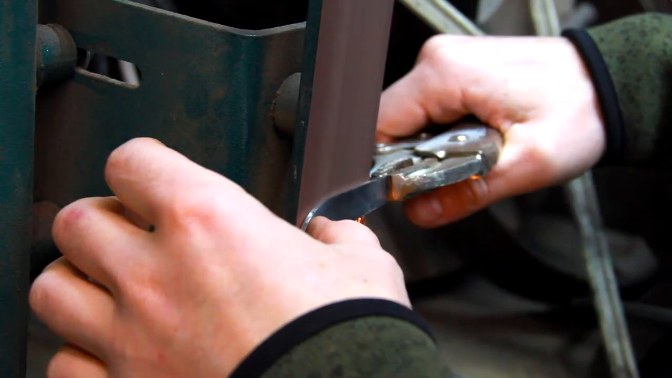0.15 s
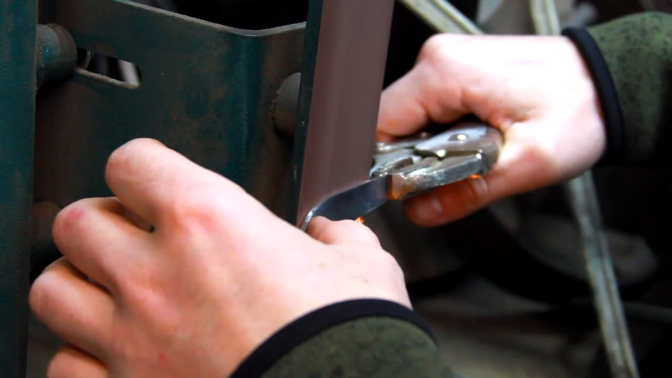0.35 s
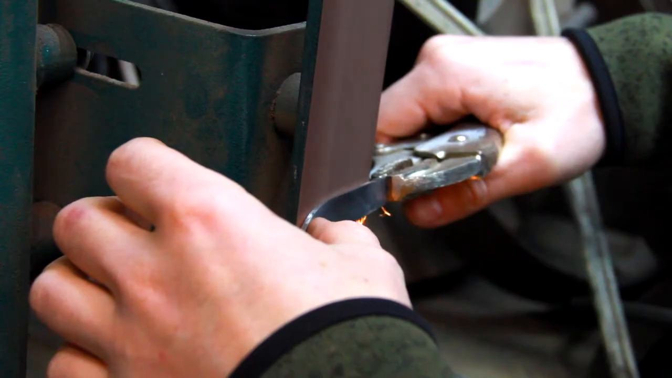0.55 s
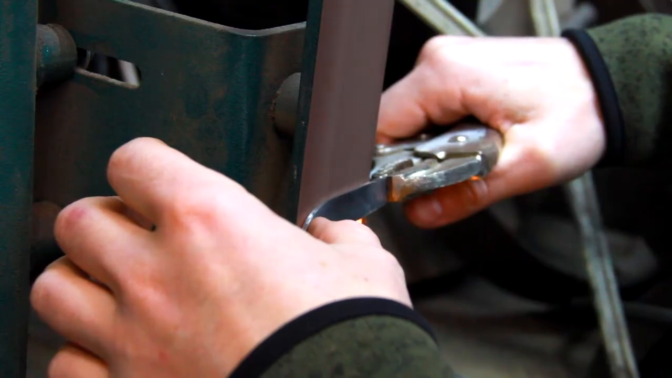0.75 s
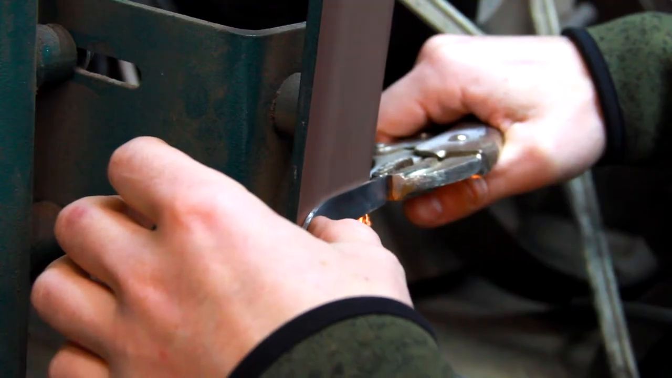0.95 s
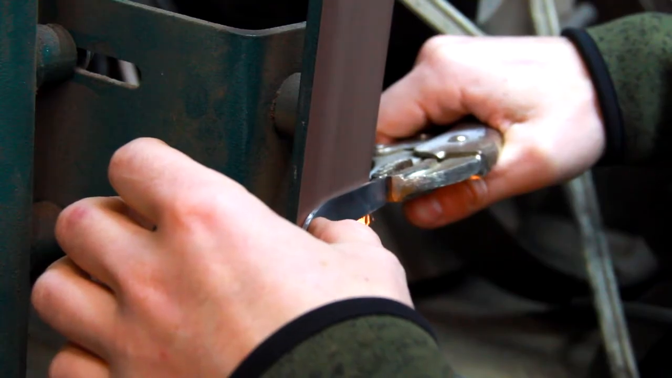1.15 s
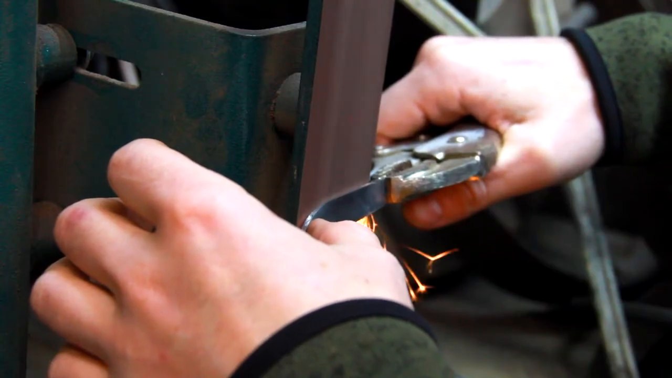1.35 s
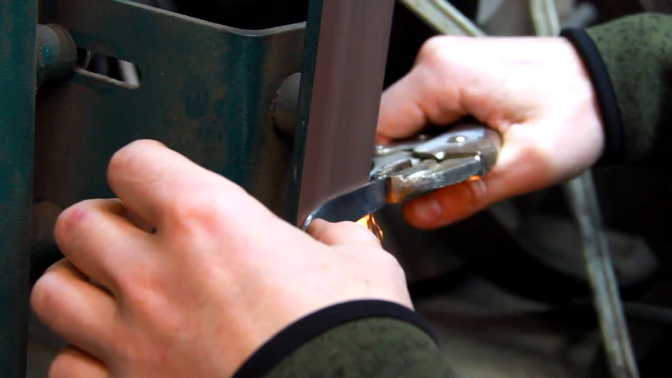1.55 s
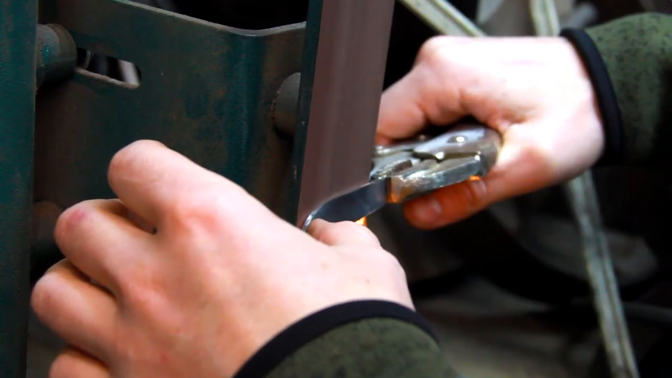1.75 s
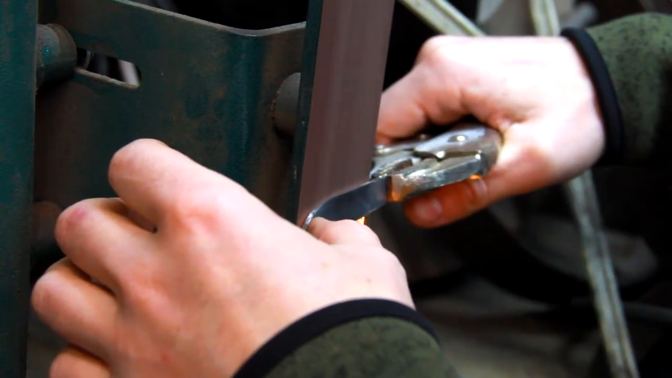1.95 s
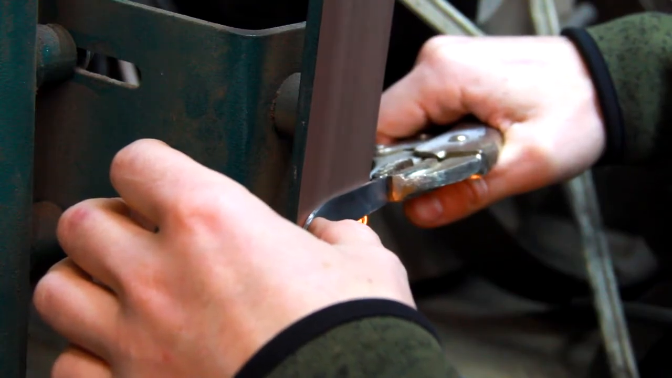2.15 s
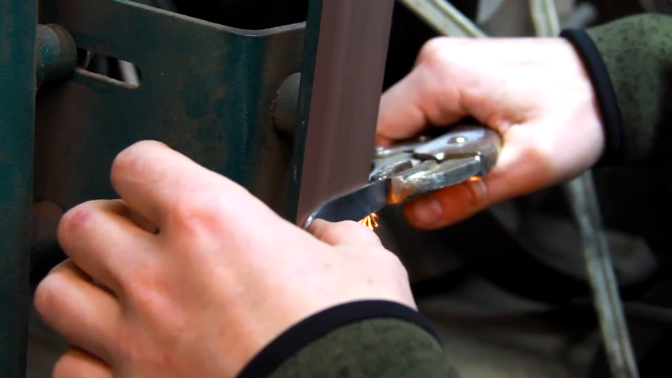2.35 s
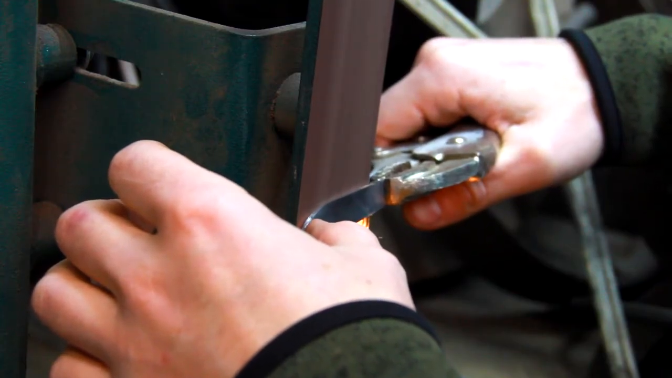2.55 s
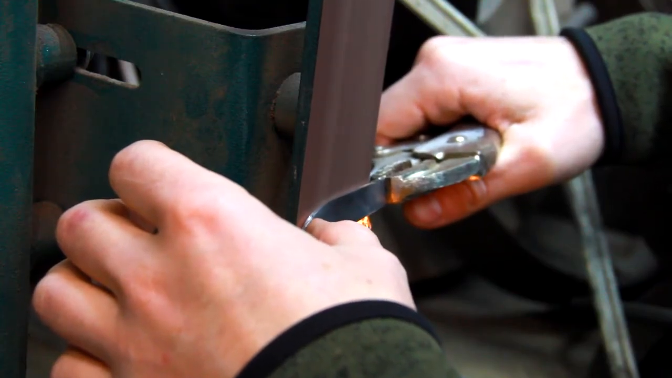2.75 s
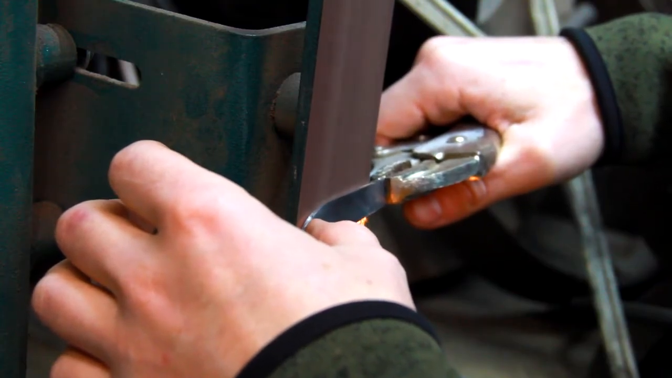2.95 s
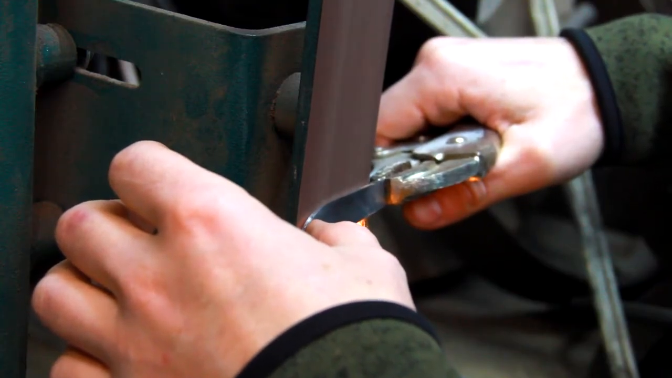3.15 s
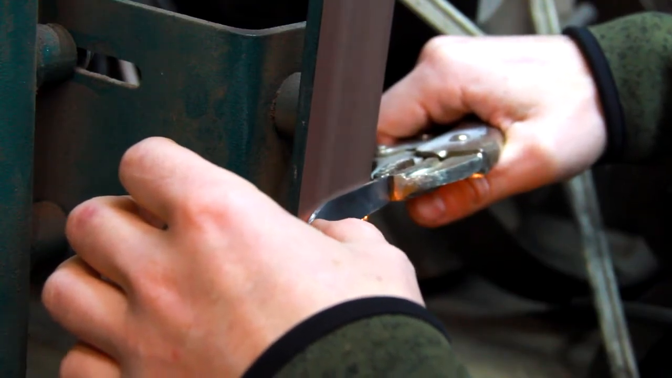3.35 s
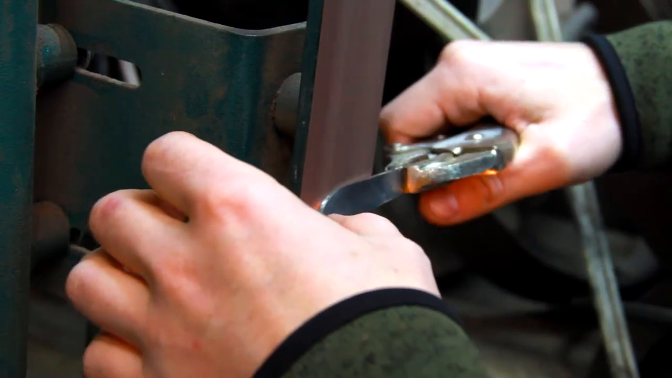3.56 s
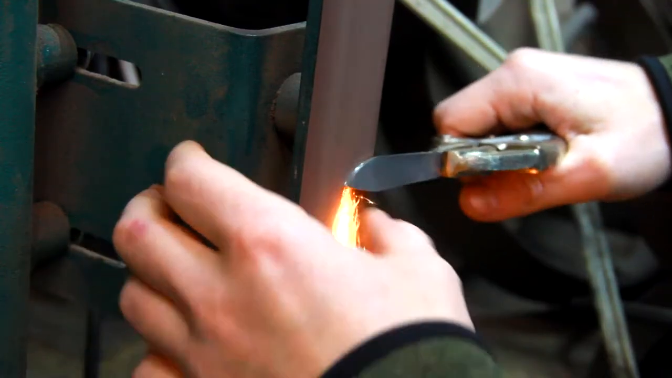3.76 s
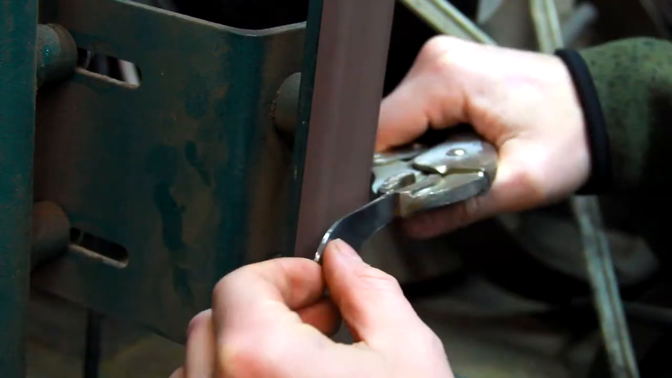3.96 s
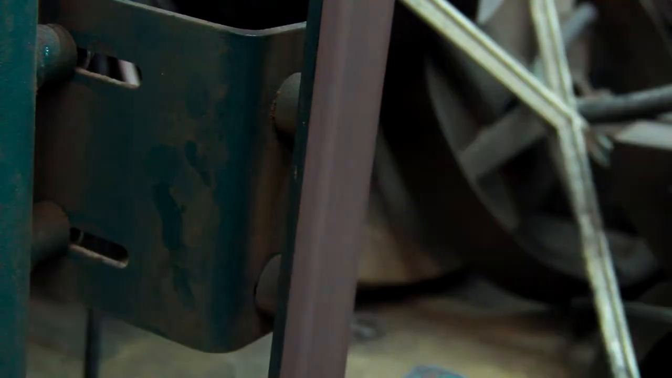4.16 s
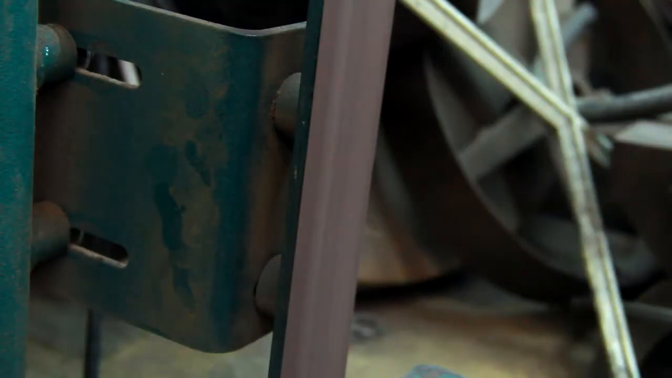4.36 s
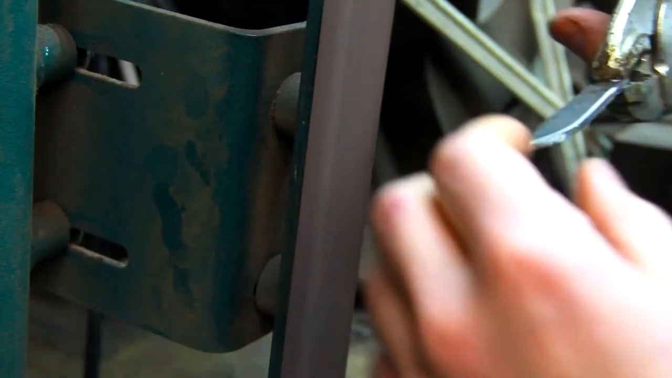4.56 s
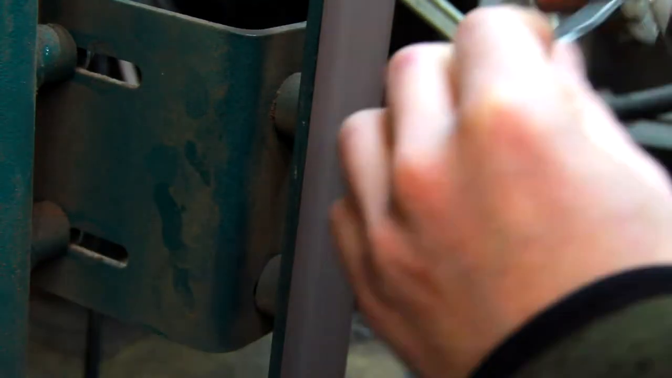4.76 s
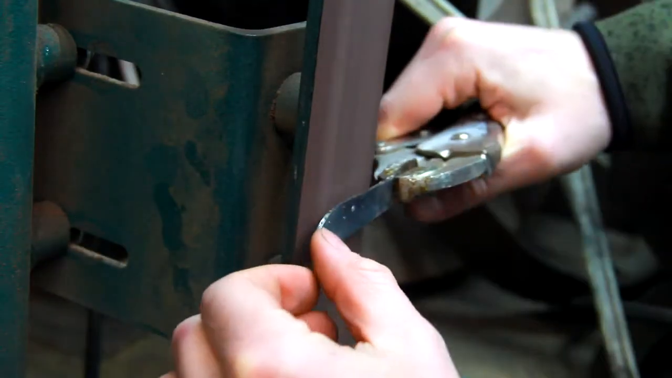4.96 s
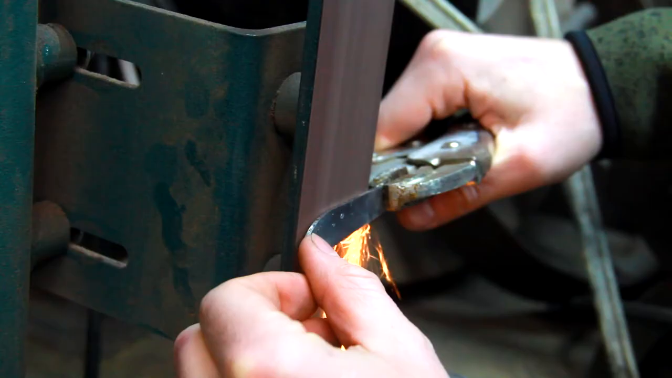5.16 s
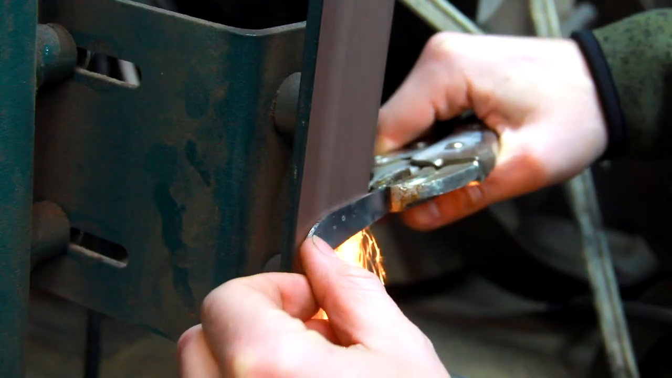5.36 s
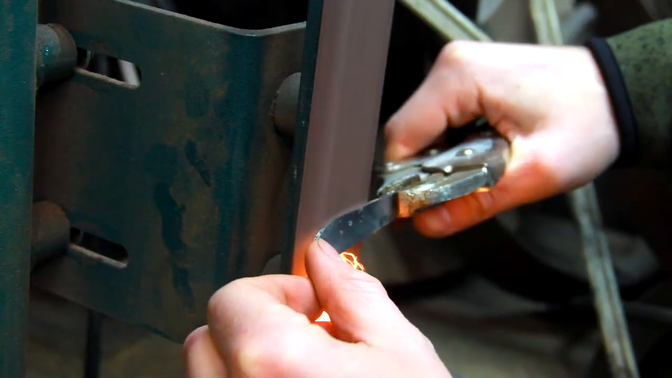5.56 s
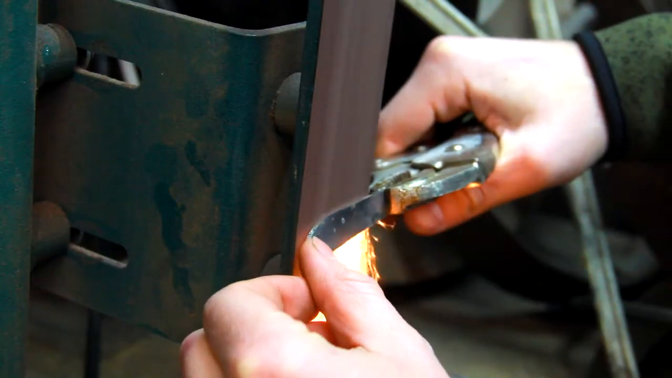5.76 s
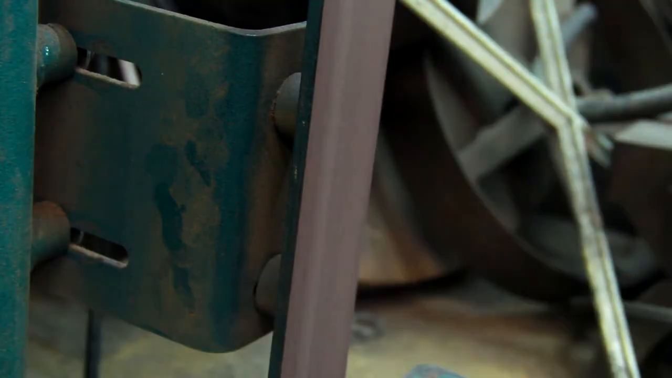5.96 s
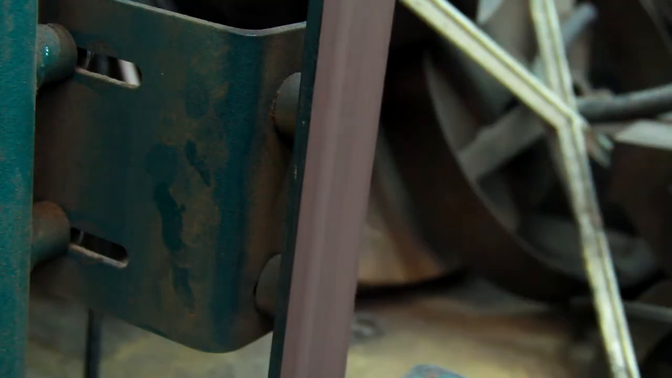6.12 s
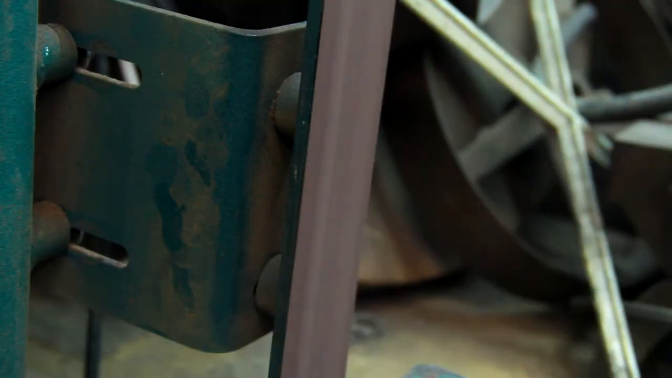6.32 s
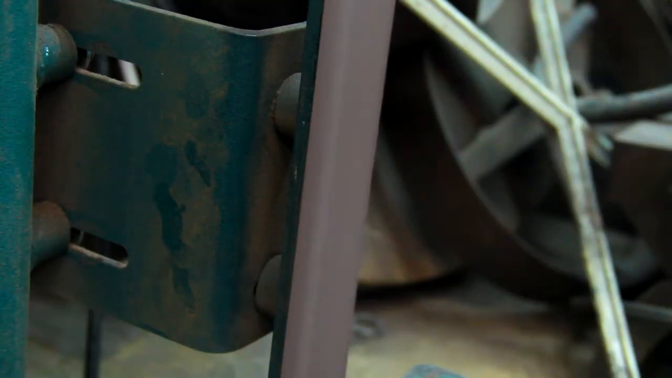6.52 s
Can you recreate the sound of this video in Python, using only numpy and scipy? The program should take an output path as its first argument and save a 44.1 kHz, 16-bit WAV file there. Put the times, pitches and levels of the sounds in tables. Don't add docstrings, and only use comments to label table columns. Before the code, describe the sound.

From 0 to about 3.27 s a belt grinder runs steadily in a workshop: low mains hum, a singing shaft and wheels, rumbling frame. A steel blade pressed to the belt gives a bright, gritty hiss with metallic resonances that drift up and down. Roughly every 0.1 s the belt splice strikes it, a tight double knock with a sharp crack as the blade drops back, varying in force. At 3.27 s everything jumps abruptly to ten times speed: hum and shaft become a high whine, and the knocks merge into a raspy buzz. It cuts hard until 3.58, lightly until 3.86, then the machine runs free. A short dull clunk comes at 4.4 s. Buzzing eases in again at 5.1, with a firm touch to 5.6, a lighter one, and a last firm one ending at 5.88. Only the free-running whine remains to the end. Close microphone, short room echo, no deep bass.

```python
import sys
import numpy as np
from scipy import signal
from scipy.fft import rfft, irfft, next_fast_len
from scipy.io import wavfile
from scipy.ndimage import uniform_filter1d

SR = 44100
rng = np.random.default_rng(int(sys.argv[2]) if len(sys.argv) > 2 else 0)


def store_pcm(level_fs):
    pcm = np.round(np.clip(level_fs, -1, 1) * 32767).astype(np.int16)
    wavfile.write(sys.argv[1], SR, np.atleast_2d(pcm).T)


def attenuation_scalar(level_db):
    decades = np.asarray(level_db, float) / 20
    return 10 ** decades


N = 290619
TIME = np.arange(N) / SR

CUT_S, TRUE, FAST = 3.2678, 1.0, 10.0
ROOM_T60_S, ROOM_DB = 0.3, -10
MIC_LOW_HZ = 57

MAINS_HZ, SLOTS, BELT_RATIO = 60.005, 34, 0.3486
IDLE_HZ, LOAD_DB_PER_HZ = 29.783, 20
SAG_S, RECOVER_S = 2.0, 0.25
SLOT_SIDE_DB, UPPER_ORDER_DB, ORDER_FALL_DB = -64.8, -76.5, 0.6
# (multiple of shaft speed, level [dB rms])
SHAFT_TONES = [(1, -101.5), (2, -81), (3, -71.4), (6, -74.3), (8, -70), (13, -69.1), (14, -71.9), (15, -72),
               (16, -75), (18, -77.5), (21, -71.5), (22, -73.2), (23, -77.9), (24, -77.6), (25, -72.6),
               (26, -71.5), (27, -73.3), (28, -66.1), (29, -72.9), (30, -75.3), (32, -71.7), (33, -77.7),
               (34, -63.8), (35, -76.6), (36, -75.7), (37, -77.4), (39, -76.5), (40, -72.5), (41, -74.6),
               (42, -75.0)]
# (multiple of mains, level [dB rms])
HUM_TONES = [(1, -74), (2, -54.6), (4, -68.5), (6, -69.5), (8, -71)]
# (multiple of mains, multiple of shaft speed, level [dB rms])
HUM_WOBBLE = [(2, 1, -66), (2, -1, -78), (4, 1, -73), (6, 1, -74)]
# (frequency at true speed [Hz], level [dB per Hz])
RUMBLE_COLOUR = [(14, -124), (30, -116), (42, -110), (58, -92.5), (74, -99.5), (92, -84), (140, -84),
                 (300, -80.5), (410, -92), (560, -92), (900, -92), (1150, -88), (1580, -91.5), (2500, -105)]
# (frequency [Hz], width [Hz], level [dB])
FRAME_PANELS = [(144, 15, -79.5), (219.8, 14, -80.5), (232.6, 10, -77.5), (286.4, 20, -81.5),
                (315.5, 13.4, -73), (352, 6, -74.5), (370, 5.2, -90), (444, 22, -83.5), (509, 2.9, -85.5)]
# (start [s], end [s], final loss of speed [turns per s])
LOADS_TRUE = [(-4.2, 3.3, .157)]
# (start [s], end [s], final loss of speed [turns per s])
LOADS_FAST = [(2.3, 3.855, .172), (5.1, 5.886, .205)]

# (time [s], level [dB], decay [ms])
CLUNKS = [(4.437, -40.5, 3.6)]

FIRST_LAP_S, LAP_S, LAP_JITTER_MS = 0.0535, 0.09684, 0.6
SPLICE_MS, SPLICE_SPREAD_MS = 7.75, 1.183
LEAD_DB, TRAIL_DB, CRACK_DB, PATCH_DB = -35, -37, -34, -38
EDGE_SPREAD_DB, PATCH_SPREAD_DB = 0, 3
# (time [s], leading edge [dB], trailing edge [dB], crack [dB])
ODD_LAPS = [(.151, -5, -1, 1), (.248, -4, -6, 0), (.344, 2, -2, 4.5), (.442, 1, 3, 5), (.539, 2, 5, -1),
            (.634, -1, 2, 3), (.73, -2.5, -4, 0), (.828, 1, -2, 4), (1.022, -1, 1, 0), (1.118, 1, -2, 2),
            (1.312, 4.5, 1.5, -2), (1.506, 2.5, 2, -3), (1.602, 3, -0.5, -3), (1.699, 0, -1.5, -11),
            (1.797, 0, 2, 4), (2.086, 2.5, -4, 0), (2.572, 3.5, 1, 0.5), (2.862, 2, 3, 2),
            (2.959, -2, -3, -16), (3.152, 1.5, 2, 5.5)]
# (frequency [Hz], width [Hz], level [dB])
FRAME_KNOCK = [(450, 36, 0), (527, 20, 7), (722, 20, 6), (806, 36, 0)]
# (frequency [Hz], width [Hz], level [dB])
BLADE_KNOCK = [(1246, 130, -7), (1680, 22, -4), (2038, 190, -5), (2720, 870, -5.5), (3000, 120, 2.5),
               (3620, 57, 1)]
# (frequency [Hz], width [Hz], level [dB])
CRACK_MODES = [(8100, 1700, 0), (12500, 4000, -10)]

HISS_DB = -42
# (frequency [Hz], width [Hz])
BLADE_MODES = [(2076, 25), (3120, 120), (3270, 160), (3500, 60), (3860, 40), (5248, 36), (5360, 40),
               (6033, 32), (7080, 110), (7280, 40), (7665, 50), (7860, 100), (8220, 60), (8830, 60),
               (9430, 120), (10420, 110), (12900, 80)]
BLADE_MODE_DB = [2.5, -0.5, 4, -0.5, 1, 10, 4.5, 8, 1, 3.5, 3.5, 1, 0, -4, -9.5, -13, -6]
# (frequency [Hz], level [dB per Hz])
GRIT_COLOUR = [(500, -28), (750, -5), (950, -42), (1150, -9), (1550, -19.5), (2300, -11.5), (3150, -8.5),
               (4600, -9.5), (5700, -7), (6500, -9), (7900, -7), (10500, -5.5), (12500, -7.5), (15500, -12)]
# (start [s], end [s], low knock [dB], high knock [dB], scrape [dB])
FAST_TOUCHES = [
    (3.1, 3.58, -59.5, -59, -60),
    (3.548, 3.86, -72, -60.5, -75),
    (5.1, 5.596, -62, -61.5, -63),
    (5.17, 5.33, -69, -75, -68),
    (5.55, 5.74, -75, -64, -72),
    (5.71, 5.88, -60, -58, -64),
]
ATTACK_S, RELEASE_S = 0.06, 0.013
FREE_BELT_DB, FREE_SLAP_DB = -86, -76


def level(x, db):
    return x * attenuation_scalar(db) / np.sqrt(np.mean(x ** 2))


def colour(x, points, speed):
    hz, db = np.transpose(points)
    size = next_fast_len(N)
    bins = np.maximum(np.arange(size // 2 + 1) * SR / size, 1)
    gain = attenuation_scalar(np.interp(np.log(bins), np.log(hz * speed), db))
    return irfft(rfft(x, size) * gain, size)[:N]


def ring(x, modes, speed):
    total = 0
    for hz, width, db in modes:
        if hz * speed < 0.4 * SR:
            total = total + attenuation_scalar(db) * signal.lfilter(*signal.iirpeak(hz * speed, hz / width, SR), x)
    return total


def walk(rate):
    hold = int(SR / rate)
    steps = np.repeat(rng.standard_normal(N // hold + 1), hold)
    return 0.9 * uniform_filter1d(uniform_filter1d(steps, hold), hold)[:N]


def taps(times, sizes):
    place = np.asarray(times) * SR
    whole = place.astype(int)
    out = np.zeros(N + 2)
    np.add.at(out, whole, sizes * (1 - place + whole))
    np.add.at(out, whole + 1, sizes * (place - whole))
    return out[:N]


def puff(x, ms):
    return signal.lfilter([1], [1, -np.exp(-1000 / (ms * SR))], x)


def swell(x, ms):
    return puff(puff(x, ms / 3), ms) * 3000 / (ms * SR)


def steep(x, hz):
    return signal.sosfilt(signal.butter(4, hz, "high", fs=SR, output="sos"), x)


def circuit_hiss():
    return attenuation_scalar(-99) * steep(rng.standard_normal(N), 130)


def room(x, speed):
    t = np.arange(int(ROOM_T60_S * SR / speed)) / SR
    tail = rng.standard_normal(len(t)) * attenuation_scalar(-60 * t * speed / ROOM_T60_S)
    tail = tail * attenuation_scalar(ROOM_DB) / np.sqrt(np.sum(tail ** 2))
    return (x + signal.oaconvolve(x, tail)[:N]) / np.sqrt(1 + attenuation_scalar(2 * ROOM_DB))


def frame_rumble(speed):
    air, shake = rng.standard_normal((2, N))
    panels = colour(ring(shake, FRAME_PANELS, speed), [(70, -30), (140, 0), (400, 0), (650, -14)], speed)
    rumble = (colour(air, RUMBLE_COLOUR, speed) + panels) * attenuation_scalar(44.5) / np.sqrt(speed)
    return rumble * attenuation_scalar(1.05 * walk(6 * speed))


def shaft_speed(loads, speed):
    slowing = 0
    for on, off, slip in loads:
        sag = 1 - np.exp(-np.maximum(TIME - on, 0) * speed / SAG_S)
        recover = np.clip((off - TIME) * speed / RECOVER_S + 0.5, 0, 1)
        slowing = slowing + slip * sag * recover
    return IDLE_HZ - slowing


def mains_hum(mains, shaft, slip_hz):
    hum = attenuation_scalar(SLOT_SIDE_DB + LOAD_DB_PER_HZ * slip_hz) * np.sin(SLOTS * shaft + 2 * mains)
    for k, db in HUM_TONES:
        hum = hum + attenuation_scalar(db + 0.34 * walk(3 * MAINS_SPEED(mains))) * np.sin(k * mains)
    for k, m, db in HUM_WOBBLE:
        hum = hum + attenuation_scalar(db + walk(8 * MAINS_SPEED(mains))) * np.sin(k * mains + m * shaft)
    return hum


def MAINS_SPEED(mains):
    return (mains[1] - mains[0]) * SR / (2 * np.pi * MAINS_HZ)


def shaft_song(shaft, slip_hz, speed):
    last = int(SHAFT_TONES[-1][0])
    upper = []
    for k in range(last + 1, 53):
        upper.append((k, UPPER_ORDER_DB - ORDER_FALL_DB * (k - last) + 2 * rng.standard_normal()))
    waver = 2.6 * walk(7 * speed)
    song = 0
    for k, db in list(SHAFT_TONES) + upper:
        if k == SLOTS:
            change_db = LOAD_DB_PER_HZ / 2 * slip_hz
        else:
            change_db = np.roll(waver, rng.integers(N))
        song = song + attenuation_scalar(db + change_db) * np.sin(k * shaft + 2 * np.pi * rng.random())
    return song


def motor(shaft_hz, speed):
    mains = 2 * np.pi * MAINS_HZ * speed * TIME
    shaft = 2 * np.pi * np.cumsum(shaft_hz) * speed / SR
    slip_hz = IDLE_HZ - shaft_hz
    tones = mains_hum(mains, shaft, slip_hz) + shaft_song(shaft, slip_hz, speed)
    return np.sqrt(2) * tones + frame_rumble(speed)


def clunk():
    burst = sum(swell(taps([s], attenuation_scalar(db)), ms) for s, db, ms in CLUNKS)
    points = [(60, -60), (200, -1), (380, 7), (450, 0), (530, 7), (680, 0), (850, 7.0), (1500, 1)]
    return burst * level(colour(rng.standard_normal(N), points, FAST), 0)


def splice_laps():
    s = np.arange(FIRST_LAP_S, CUT_S, LAP_S)
    chance = rng.standard_normal((len(s), 6)).T
    usual_db = np.array([LEAD_DB, TRAIL_DB, CRACK_DB])
    edges_db = usual_db[:, None] + EDGE_SPREAD_DB * chance[:3]
    for when, *extra_db in ODD_LAPS:
        edges_db[:, np.argmin(np.abs(s - when))] = usual_db + extra_db
    times = s + LAP_JITTER_MS / 1000 * chance[3]
    gap_ms = SPLICE_MS + SPLICE_SPREAD_MS * chance[4]
    return times, gap_ms, *edges_db, PATCH_DB + PATCH_SPREAD_DB * chance[5]


def knock(blows, modes, speed, rough):
    rattle = rough * swell(np.abs(blows), 2.8 / speed) * rng.standard_normal(N) * np.sqrt(speed)
    return steep(ring(blows + rattle, modes, speed), 300 * speed)


def grit_hiss(turns, s):
    lift = uniform_filter1d(taps(s + 0.0045, np.ones(len(s))), int(0.004 * SR)) * 0.004 * SR
    surface = np.interp(turns * BELT_RATIO % 1 * 48, np.arange(49), rng.standard_normal(49))
    bite = attenuation_scalar(0.9 * surface + 0.6 * walk(12) + 0.8 * walk(150)) * attenuation_scalar(-4.5 * lift)
    grains = rng.standard_normal(N) * attenuation_scalar(1.1 * rng.exponential(size=N))
    singing = 0
    for (hz, width), db in zip(BLADE_MODES, BLADE_MODE_DB):
        singing = singing + ring(grains * attenuation_scalar(2 * walk(14)), [(hz, width, db)], TRUE)
    scratch = room(colour(grains, GRIT_COLOUR, TRUE), TRUE)
    return level((scratch + attenuation_scalar(-6.5) * singing) * bite, 3.15) * attenuation_scalar(HISS_DB)


def grinding(turns):
    s, gap_ms, lead_db, trail_db, crack_db, patch_db = splice_laps()
    s = s - 0.0012
    back = s + gap_ms / 1000
    blows = taps(s, attenuation_scalar(lead_db)) - taps(back, attenuation_scalar(trail_db))
    even = taps(s, attenuation_scalar(lead_db / 3)) - taps(s + SPLICE_MS / 1000, attenuation_scalar(trail_db / 3))
    thud = attenuation_scalar(4) * knock(even, FRAME_KNOCK, TRUE, rough=0.064)
    clang = attenuation_scalar(22.5) * knock(blows, BLADE_KNOCK, TRUE, rough=0.34)
    burst = swell(taps(back - 0.0006, attenuation_scalar(crack_db)), 1.7)
    crack = burst * level(ring(rng.standard_normal(N), CRACK_MODES, TRUE), 1.5)
    patch = ring(taps(s - 0.0285, attenuation_scalar(patch_db)), [(3360, 240, 28)], TRUE)
    return grit_hiss(turns, s) + crack + patch + thud + clang


def touch(on, off):
    return np.clip((TIME - on) / ATTACK_S, 0, 1) * np.clip((off - TIME) / RELEASE_S, 0, 1)


def grinding_fast(turns):
    laps = TIME[1:][np.diff(np.floor(turns * BELT_RATIO)) > 0]
    lead, trail = attenuation_scalar(0.9 * rng.standard_normal((len(laps), 2)).T)
    back = np.minimum(laps + SPLICE_MS / 1000 / FAST, TIME[-1])
    blows = taps(laps, lead) - taps(back, trail)
    low, high, scrape = sum(np.outer(attenuation_scalar(db), touch(on, off)) for on, off, *db in FAST_TOUCHES)
    low = low + attenuation_scalar(FREE_SLAP_DB)
    scrape = scrape + attenuation_scalar(FREE_BELT_DB)
    frame_buzz = low * level(knock(blows, FRAME_KNOCK, FAST, rough=0.051), 0)
    blade_buzz = high * level(knock(blows, BLADE_KNOCK, FAST, rough=0.35), 0)
    points = [(100, -75), (330, -11.5), (480, 3.5), (620, 2.5), (800, 6.0), (920, -1.0), (1170, 5),
              (1500, -2), (1600, -2.5)]
    rub = colour(rng.standard_normal(N), points, FAST)
    return frame_buzz + blade_buzz + scrape * level(rub, 0)


def scene():
    slow_hz = shaft_speed(LOADS_TRUE, TRUE)
    fast_hz = shaft_speed(LOADS_FAST, FAST)
    before = motor(slow_hz, TRUE) + grinding(np.cumsum(slow_hz) / SR)
    after = motor(fast_hz, FAST) + clunk() + grinding_fast(np.cumsum(fast_hz) * FAST / SR)
    mono = np.where(TIME < CUT_S, before, after) + circuit_hiss()
    return np.array([mono, mono])


def low_pass(x):
    return signal.sosfilt(signal.butter(12, 15740, fs=SR, output="sos"), x)


def record(dry):
    mix = signal.sosfilt(signal.butter(1, MIC_LOW_HZ, "high", fs=SR, output="sos"), dry)
    return low_pass(mix)


dry = scene()
out = record(dry)
store_pcm(out)
```